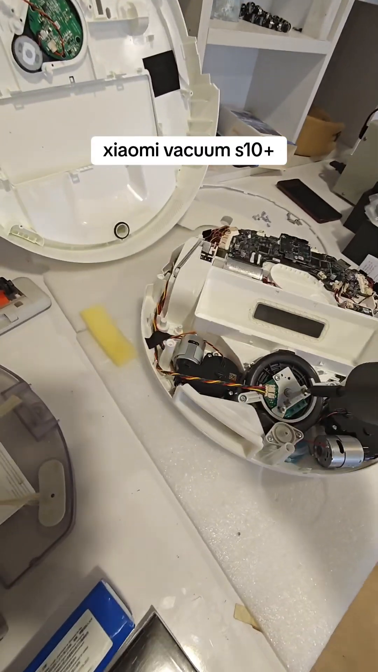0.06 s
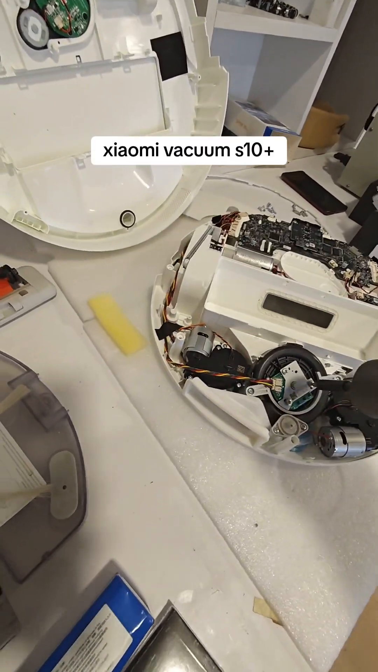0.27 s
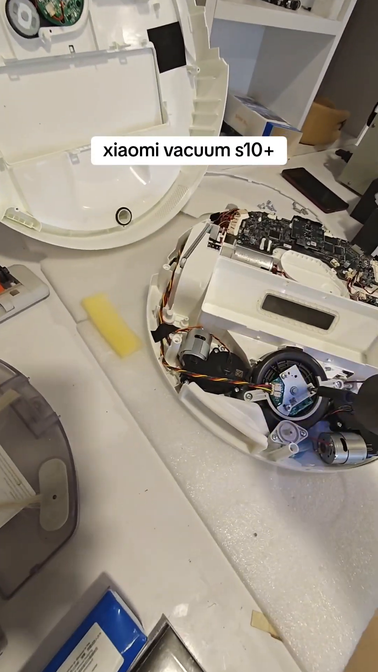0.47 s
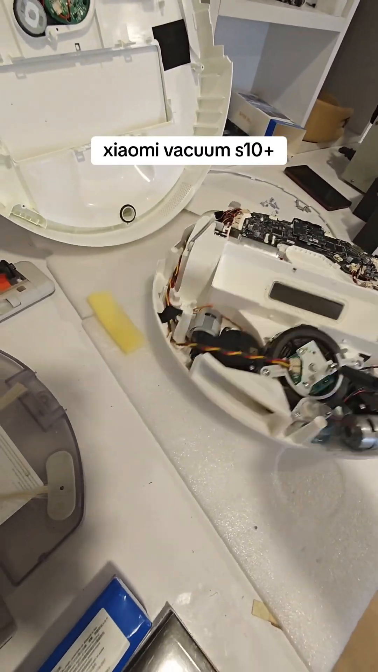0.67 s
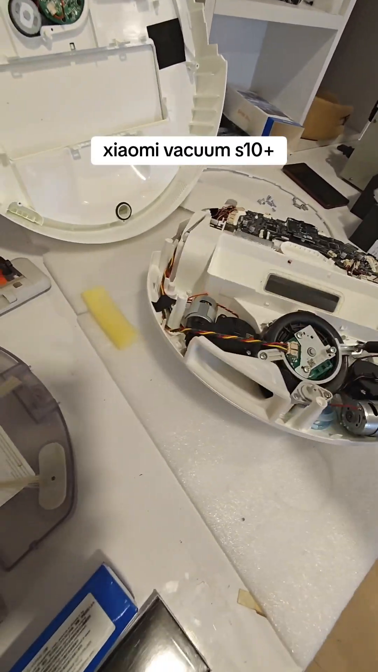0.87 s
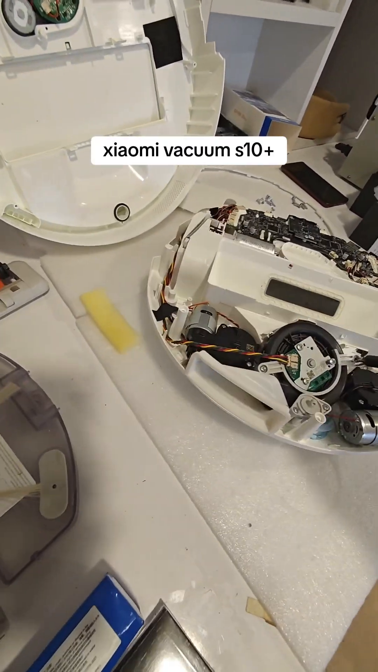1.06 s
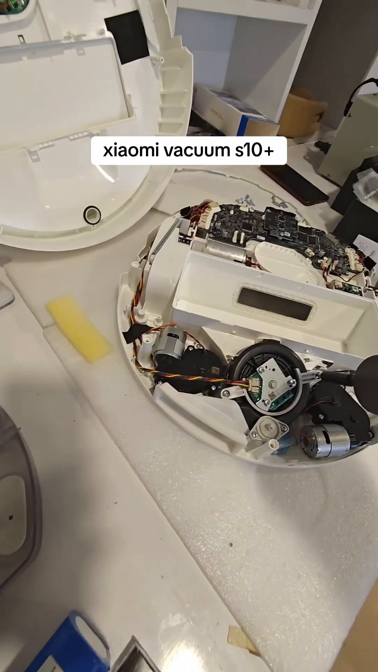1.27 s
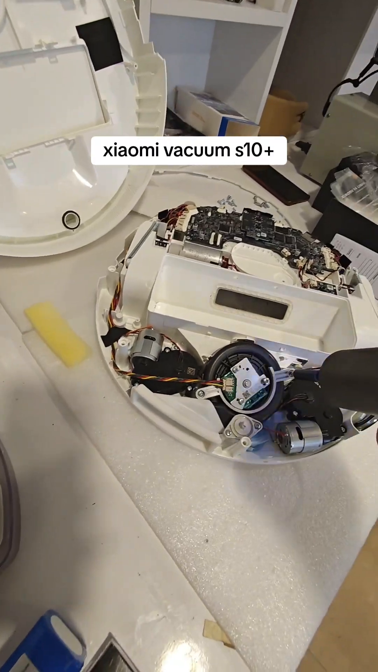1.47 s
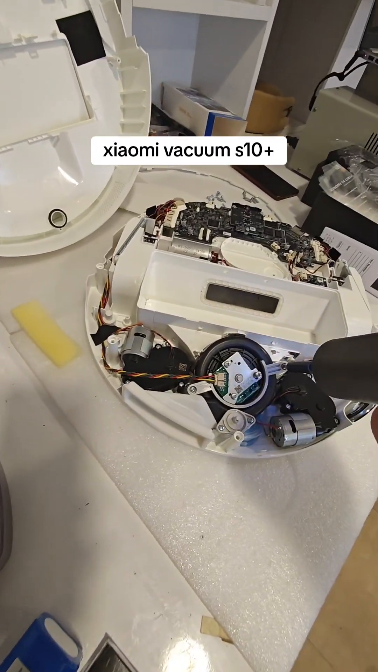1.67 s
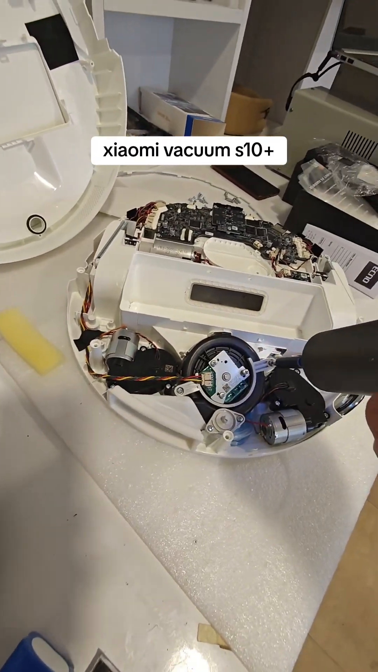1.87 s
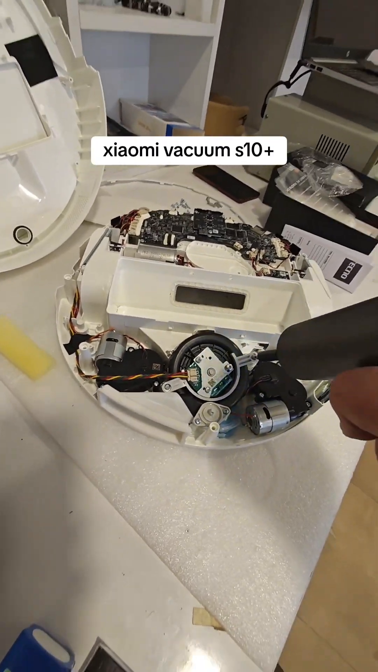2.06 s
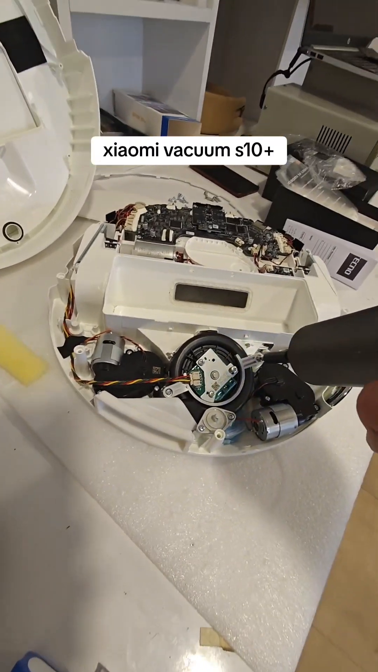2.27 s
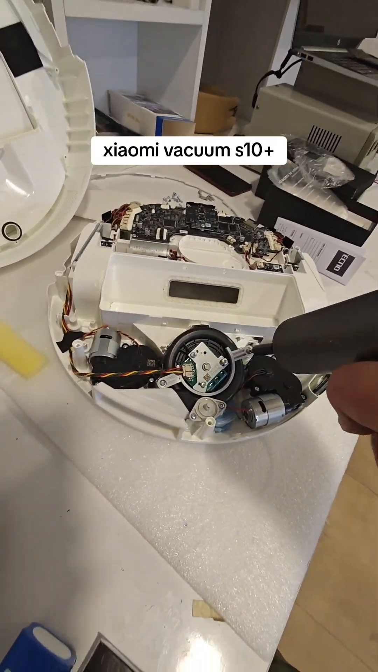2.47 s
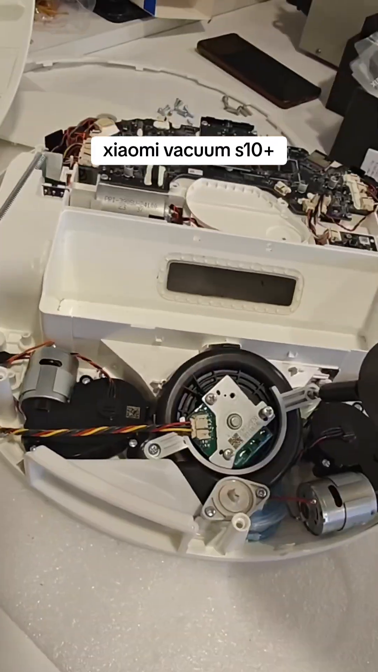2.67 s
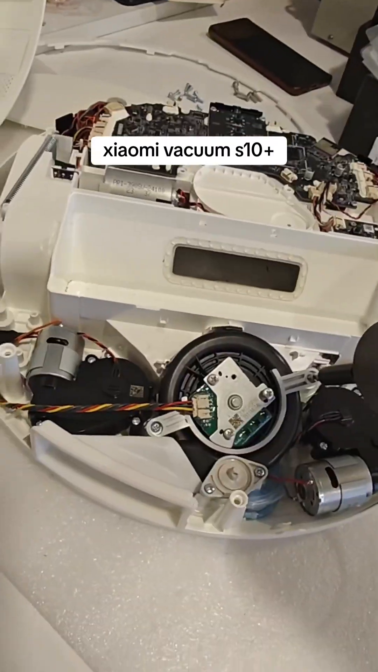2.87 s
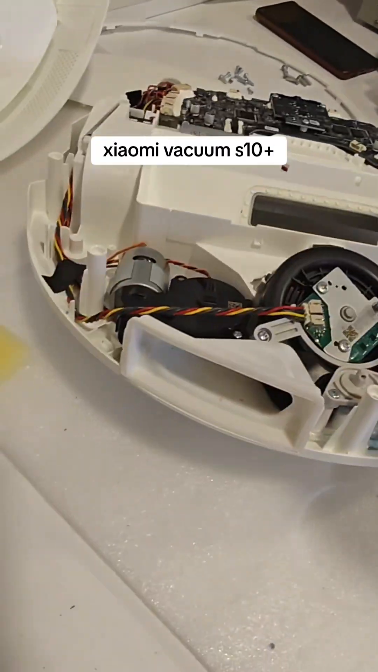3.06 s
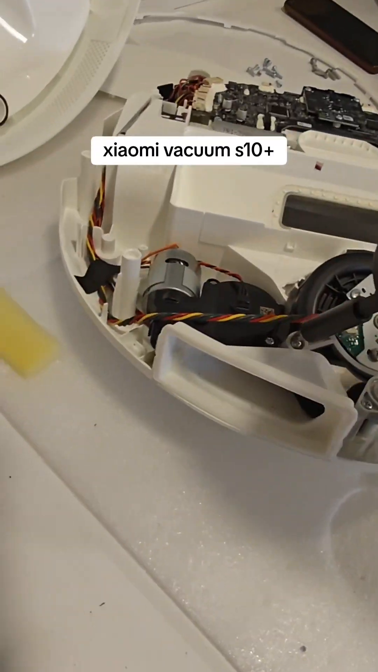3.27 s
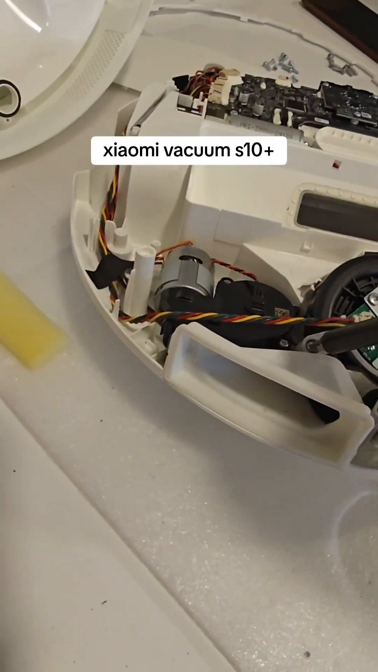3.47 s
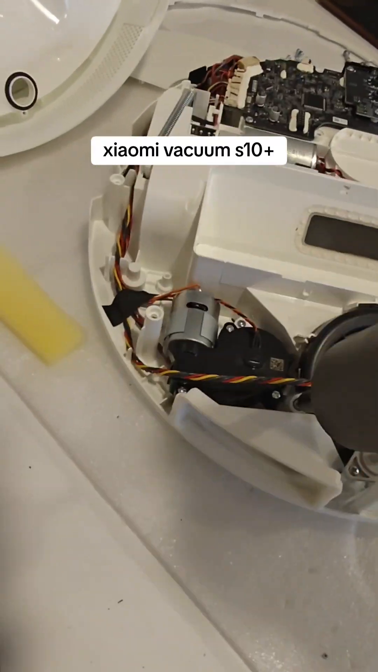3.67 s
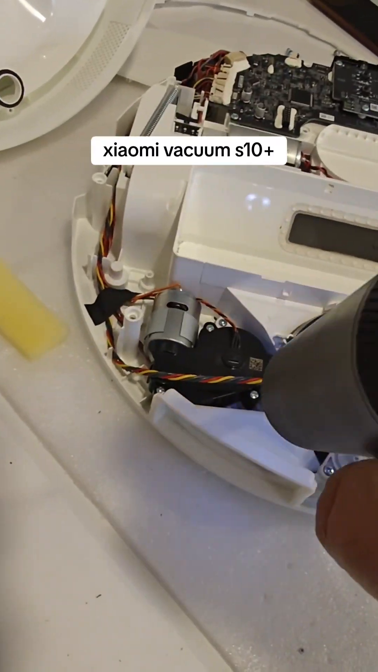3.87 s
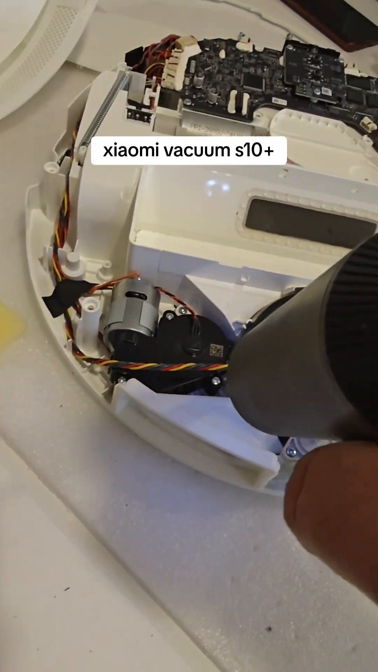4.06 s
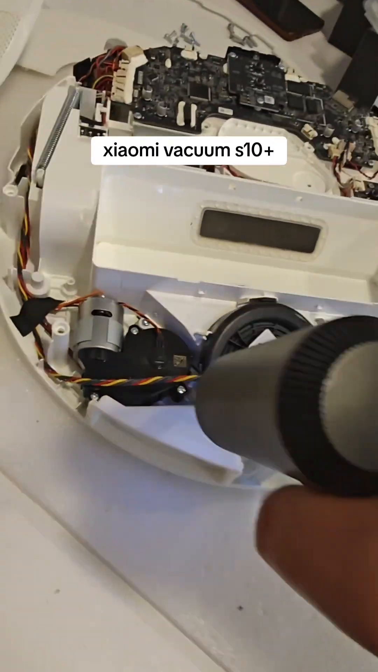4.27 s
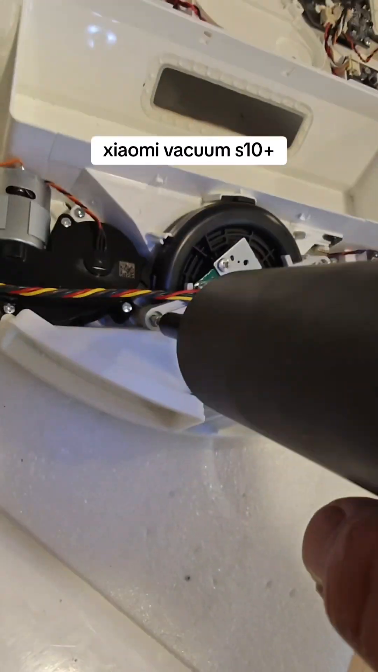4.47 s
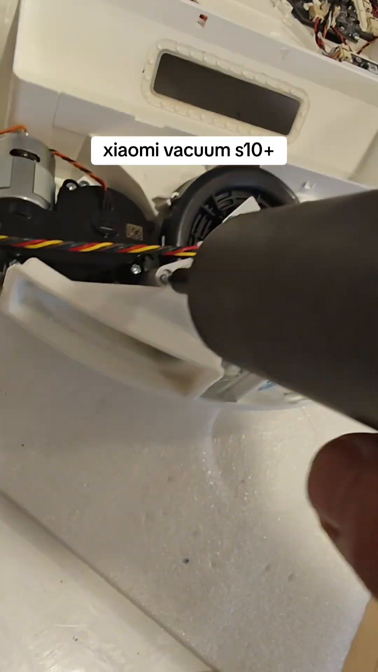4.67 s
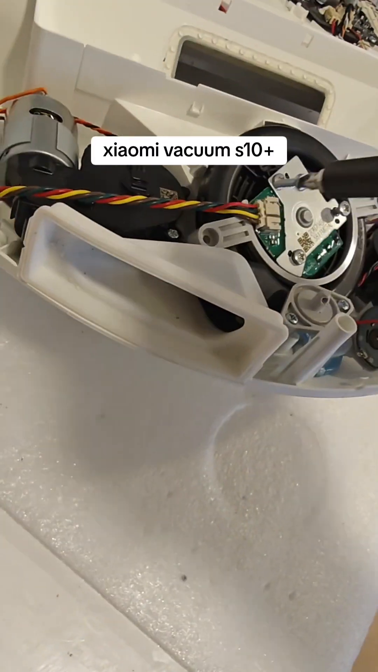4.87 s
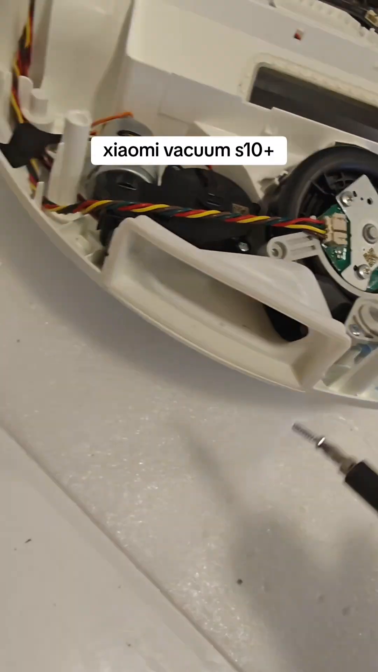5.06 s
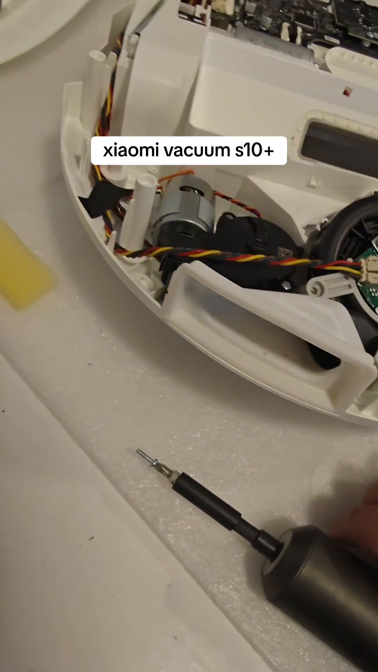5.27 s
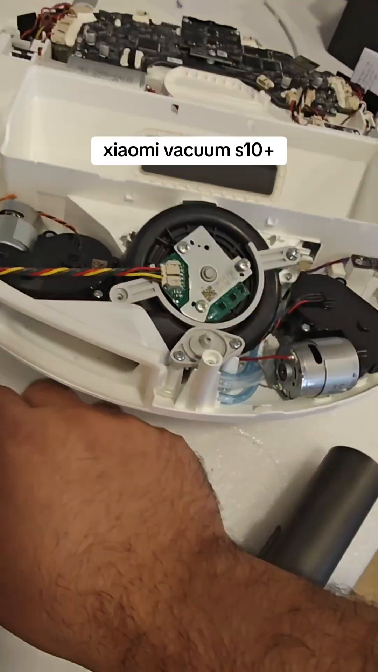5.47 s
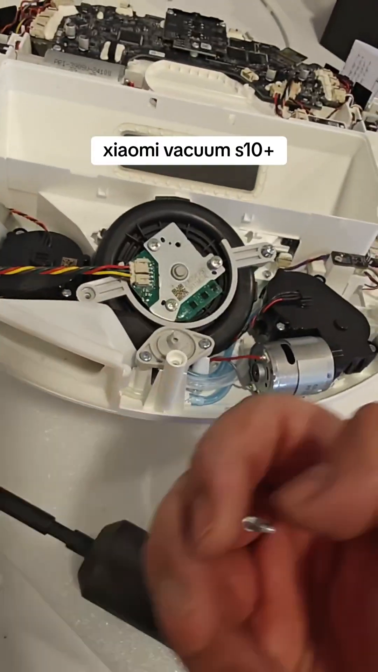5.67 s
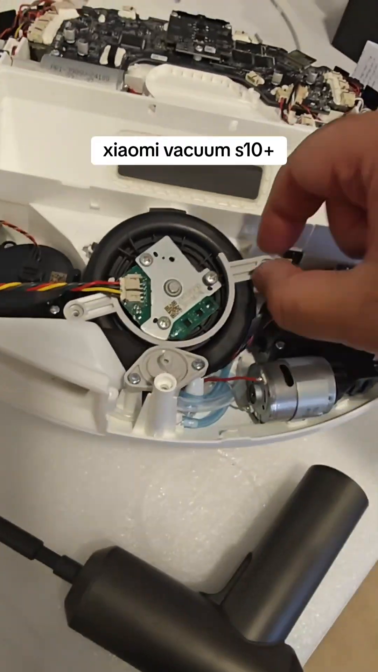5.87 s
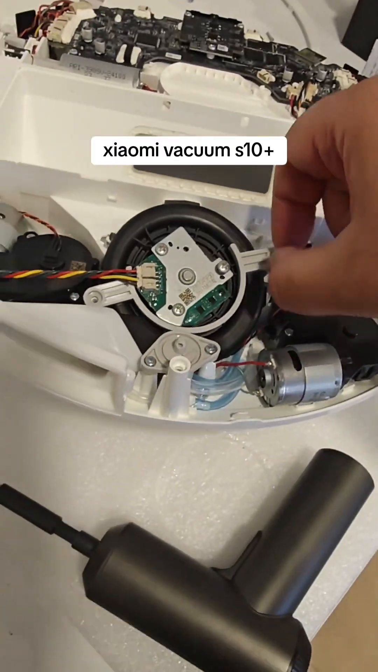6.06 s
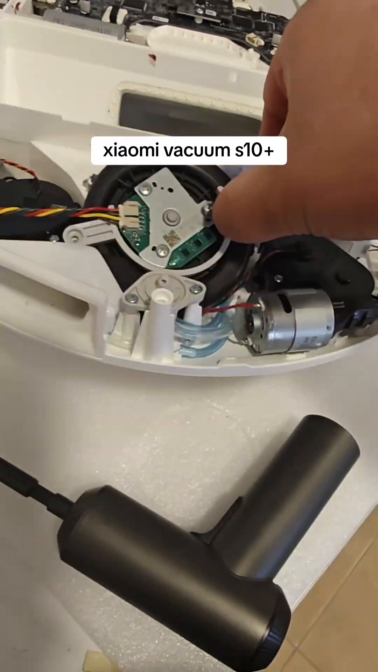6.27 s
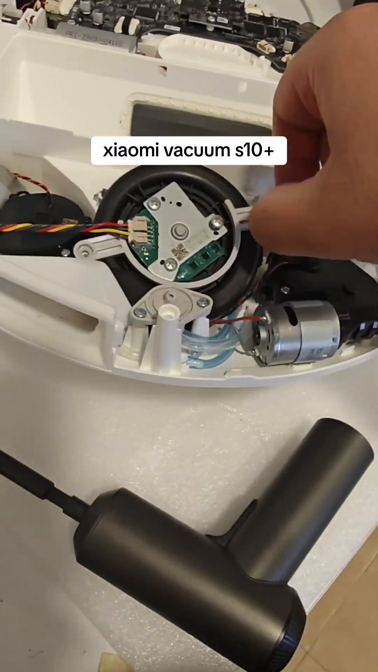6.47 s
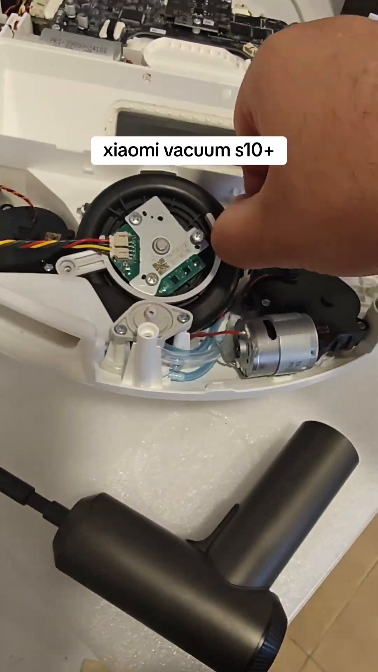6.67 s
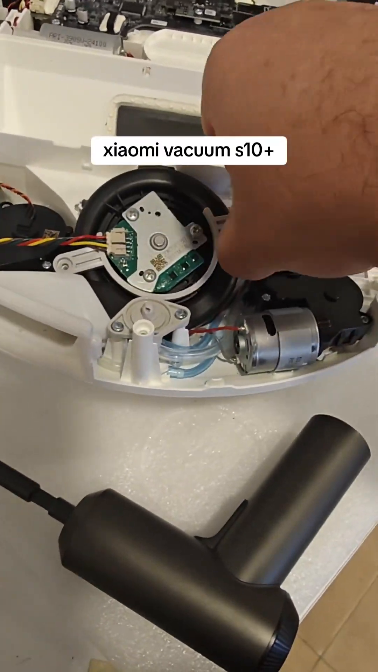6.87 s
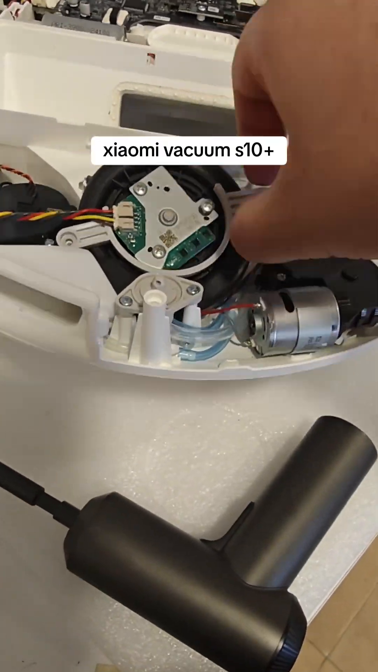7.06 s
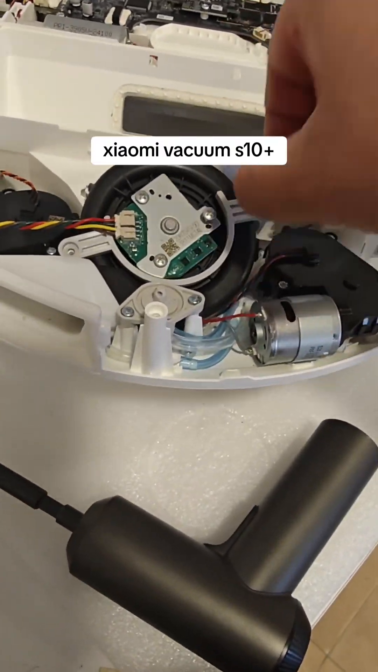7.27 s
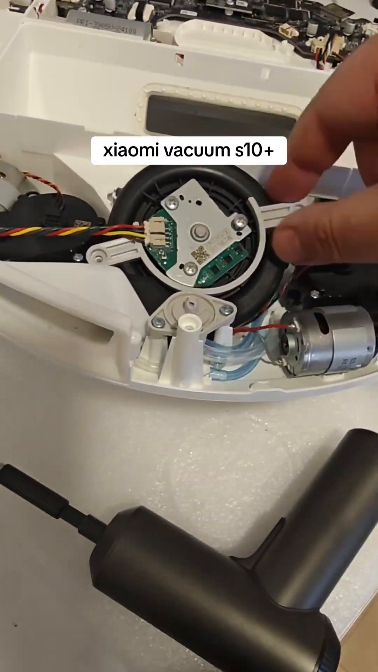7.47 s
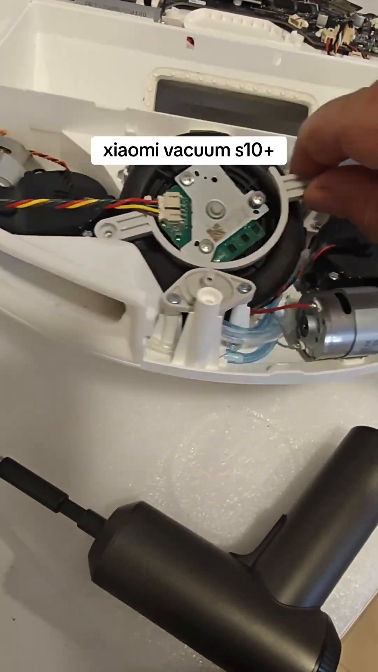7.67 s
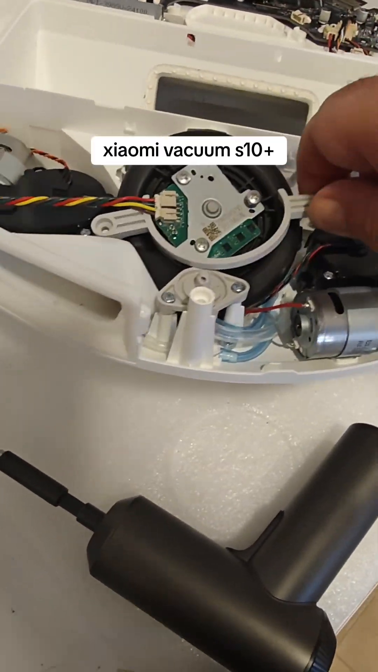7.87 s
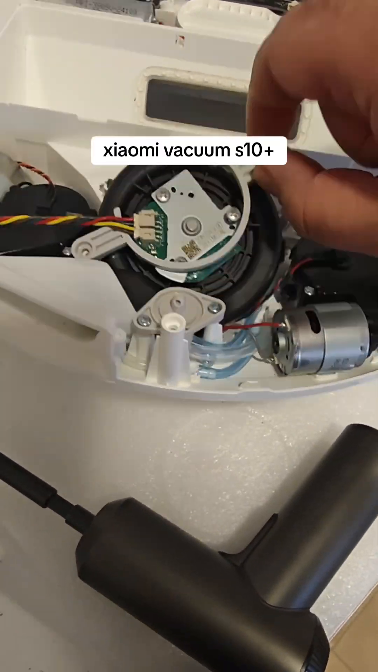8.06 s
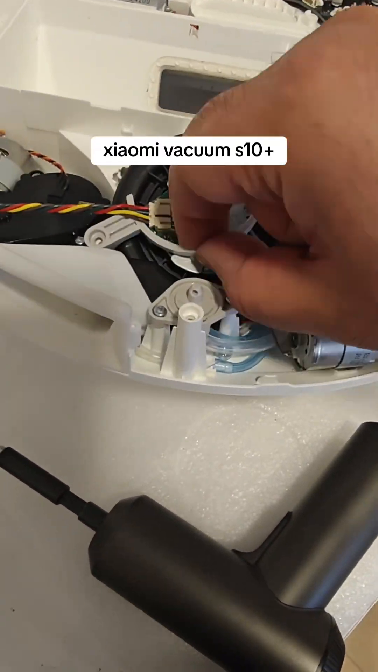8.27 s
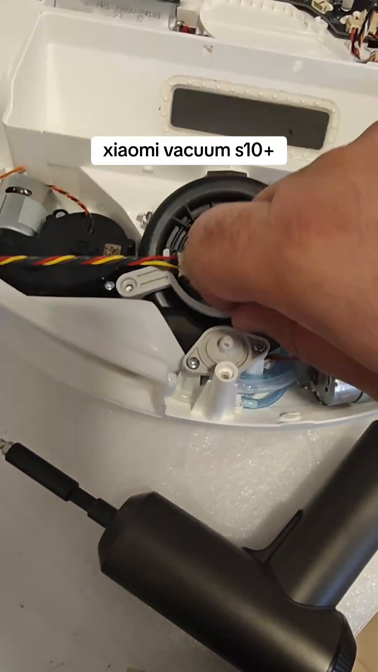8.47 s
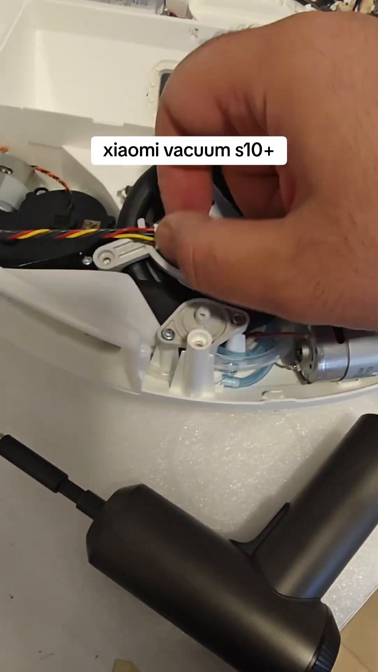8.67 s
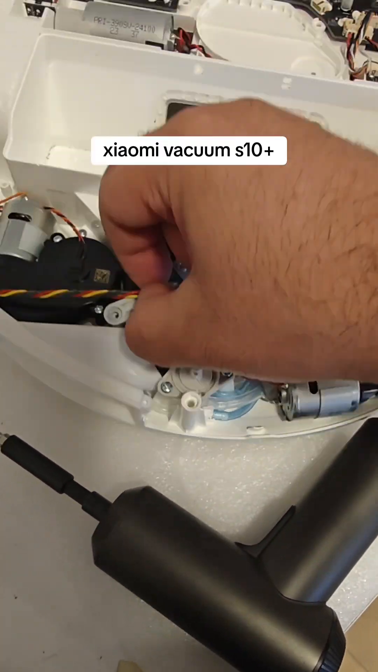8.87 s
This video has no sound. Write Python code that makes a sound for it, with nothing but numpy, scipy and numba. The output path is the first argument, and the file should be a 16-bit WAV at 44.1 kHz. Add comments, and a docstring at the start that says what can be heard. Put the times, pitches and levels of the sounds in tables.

```python
"""First, fingers rub and knock on an opened plastic appliance while a quiet room hums below.
Then a cordless screwdriver runs in four short bursts: gears hiss, brushes fizz and the motor whines.
Between and after the bursts, the bit, the tool and fingers knock and rub the plastic parts, and just
after the last burst the tool scrapes softly on foam. Each knock or scrape is a soft-edged puff of
ringing noise. Left and right sound alike only in the bass."""
import sys
import numpy as np
from scipy import signal
from scipy.fft import rfft, irfft, next_fast_len
from scipy.io import wavfile
from scipy.ndimage import uniform_filter1d, map_coordinates
from numba import njit

SR = 44100
rng = np.random.default_rng(int(sys.argv[2]) if len(sys.argv) > 2 else 0)


def inscribe(sig):
    """Save sig as 16-bit PCM at rate SR to the path in sys.argv[1].

    A 1-D sig is mono; a 2-D sig holds one channel per row.
    Samples are clipped to [-1, 1] before scaling.
    """
    pcm = np.round(np.clip(np.atleast_2d(sig).T, -1, 1) * 32767)
    wavfile.write(sys.argv[1], SR, pcm.astype(np.int16))


N = 393372


def undb(db):
    """Turn decibels into a gain to multiply by."""
    return 10 ** (np.asarray(db) / 20)


def on_log(table, hz):
    """Read between (frequency, value) rows, giving every octave equal room."""
    freqs, values = np.transpose(table)
    return np.interp(np.log(hz), np.log(freqs), values)


# How alike left and right sound: (frequency [Hz], likeness [0-1])
STEREO_LIKENESS = [(40, .99), (85, .965), (150, .87), (330, .82), (550, .35), (1200, .22), (2000, .03),
                   (9000, .05)]

def hiss(colour):
    """Stereo noise of strength 1, shaped by (frequency [Hz], level [dB]) rows and silent outside them."""
    size = next_fast_len(N)
    hz = np.maximum(np.arange(size // 2 + 1) * SR / size, 1)
    gain = undb(on_log(colour, hz)) * (hz > colour[0][0]) * (hz < colour[-1][0])
    alike = np.clip(on_log(STEREO_LIKENESS, hz), 0, 1)
    mid, side = rfft(rng.standard_normal((2, size))) * gain * np.sqrt([1 + alike, 1 - alike])
    out = irfft([mid + side, mid - side], size)[:, :N]
    return out / np.sqrt(np.mean(out ** 2))


@njit
def band_pass(x, hz, sharp):
    """Let through the sound near a moving pitch; sharper means a narrower band."""
    out = np.empty(len(x))
    band, low, damping = 0., 0., 1 / sharp
    for i in range(len(x)):
        g = np.tan(np.pi * hz[i] / SR)
        v = (band + g * (x[i] - low)) / (1 + g * (g + damping))
        band, low = 2 * v - band, low + 2 * g * v
        out[i] = damping * v
    return out


def ring(hz, sharp, steady=16000):
    """Noise ringing at a fixed or moving pitch, its level evened out over `steady` samples."""
    hz = np.full(N, hz, dtype=float)
    noise = hiss([(100, 0.01), (15000, 0)])
    out = np.array([band_pass(band_pass(channel, hz, sharp), hz, sharp) for channel in noise])
    return out / np.sqrt(uniform_filter1d(np.mean(out ** 2, axis=0), size=steady))


def wander(rate):
    """A smooth random curve, roughly -1 to 1, with a new goal `rate` times a second."""
    hold = int(SR / rate)
    steps = np.repeat(rng.standard_normal(N // hold + 1), hold)
    return 0.88 * uniform_filter1d(uniform_filter1d(steps, hold), hold)[:N]


def patchy(x, depth_db, hz, rate):
    """Make patches of the sound, each `hz` wide, rise and fall at random `rate` times a second."""
    spectrum = signal.stft(x, nperseg=1024)[2]
    bins, frames = spectrum.shape[1:]
    grid = rng.standard_normal((300, 500))
    rows = np.arange(bins) * SR / 1024 / hz
    columns = np.arange(frames) * 512 / SR * rate
    places = np.meshgrid(rows, columns, indexing="ij")
    gain = undb(depth_db * map_coordinates(grid, places, order=1, mode="mirror"))
    out = signal.istft(spectrum * gain, nperseg=1024)[1][:, :N]
    return out / np.sqrt(np.mean(gain ** 2))


def curves(tables):
    """Join timed tables: give a switch (1 during a table, else 0), then a curve for each value column."""
    t = np.arange(N) / SR
    on = sum((t >= rows[0][0]) & (t < rows[-1][0]) for rows in tables)
    times, *columns = np.vstack(tables).T
    return uniform_filter1d(on * 1., size=60), *(np.interp(t, times, c) for c in columns)


# The room's slow changes: (time [s], bass [dB], murmur [dB], air [dB])
ROOM_LEVELS = [(0.0, -63.5, -61.5, -64), (0.4, -68.5, -60, -66), (1.3, -62, -61, -64.5),
               (1.7, -75, -67.5, -63), (2.1, -73.5, -67.5, -70), (2.9, -70, -67.5, -70.5),
               (3.7, -71.5, -66, -72), (4.9, -70, -64.5, -73.5), (5.4, -71.5, -67.5, -70),
               (6.5, -70, -67, -66.5), (7.85, -71, -68.5, -64.5), (8.92, -74, -64, -65)]
# Tone of the room's airy noise: (frequency [Hz], level [dB])
AIR_COLOUR = [(190, -36.5), (330, -9), (355, -2), (390, -13.5), (437, -7), (491, -12.5), (707, -5),
              (1100, -6.5), (1420, -28.5), (2400, -37), (4000, -46), (5200, -78), (8800, -120)]
# Notes the room rings at: (pitch [Hz], width [Hz], level against the murmur [dB])
ROOM_NOTES = [(127, 33, -4), (270.4, 80, -1.5), (446, 130, -8.5), (1017, 380, -10)]
MIC_HISS_DB = -95.5

def room():
    """Machines murmur through the room's resonances, wavering over a faint microphone hiss."""
    _, bass_db, murmur_db, air_db = curves([ROOM_LEVELS])
    bass_db += 3.3 * wander(4.3)
    murmur_db += 0.97 * wander(4)
    bass_db += 4.5 * wander(25)  # quick flicker
    out = undb(air_db + 2 * wander(8)) * patchy(hiss(AIR_COLOUR), 2.3, hz=148, rate=10)
    out += undb(MIC_HISS_DB) * hiss([(2500, 0), (16000, -1)])
    out += undb(bass_db) * hiss([(18, -8), (35, -0.5), (60, 1), (100, -3.5), (200, -14), (400, -20)])
    for hz, width, db in ROOM_NOTES:
        out += undb(murmur_db + db + 2.5 * wander(14)) * ring(hz, hz / width)
    return out


# Fingers sliding on plastic: (time [s], rub [dB], sizzle [dB])
RUB_LEVELS = [(0.0, -77, -92), (0.2, -72, -82), (0.38, -80, -84), (0.77, -72, -89), (1.03, -76, -92),
              (1.25, -76, -87.5), (2.04, -82, -94.5), (3.5, -81, -99), (5.101, -82, -93.5),
              (5.3, -81.5, -86), (6.29, -76.5, -96), (6.68, -71, -88), (6.84, -74.5, -98), (7.55, -74, -91),
              (7.79, -66, -79.5), (7.95, -61, -86), (8.22, -73, -84), (8.38, -69, -83), (8.7, -70.5, -100),
              (8.79, -56.5, -93), (8.92, -90, -92)]

def rubbing():
    """Skin drags over plastic in uneven slips."""
    _, rub_db, sizzle_db = curves([RUB_LEVELS])
    slips = undb(2 * wander(37))
    drag = hiss([(900, -2.5), (1400, 6.5), (2200, 5), (2900, -7), (4800, -11.5), (9000, -29)])
    sizzle = hiss([(7500, -14), (11000, -1.5), (13500, -3.5), (16000, -7)])
    return slips * patchy(undb(rub_db) * drag + undb(sizzle_db) * sizzle, 3.7, hz=397, rate=27)


def stray_touches(count=40, fade_s=0.018):
    """Extra knock rows for faint random touches, louder where the rubbing is louder."""
    when, size, shell_pick, clack_pick = rng.random((count, 4)).T
    times, rub_db, _ = np.transpose(RUB_LEVELS)
    when = when * times[-1]
    levels = np.interp(when, times, rub_db) - 9 - 2.5 * np.log(size)  # a few stand out
    return [(s, db + 8, db, db - 8, 600 + 500 * low, 1600 + 3000 * high, fade_s)
            for s, db, low, high in zip(when, levels, shell_pick, clack_pick)]


# Knocks on the plastic and, from about 5.0 to 5.75 s, soft scrapes of the tool sliding on foam:
# (peak time [s], shell [dB], clack [dB], sizzle [dB], shell pitch [Hz], clack pitch [Hz], fade [s])
KNOCKS_AND_SCRAPES = [(0.0316, -62, -75.5, -77, 725, 4300, 0.01), (0.095, -78, -85, -77, 535, 1710, 0.008),
                      (0.1352, -45, -50.5, -56, 708, 4660, 0.028), (0.2588, -62, -75, -84, 710, 2200, 0.01),
                      (0.3005, -63, -83, -67, 593, 1701, 0.0047), (0.371, -68, -80, -77, 890, 3560, 0.006),
                      (0.41, -56, -54, -40, 597, 3700, 0.008), (0.69, -70, -69, -72, 696, 1690, 0.017),
                      (0.7153, -53.5, -54.5, -46.5, 634, 4800, 0.0065),
                      (0.7234, -56.5, -51, -55, 886, 2040, 0.029),
                      (0.7534, -67, -57.5, -62, 860, 4620, 0.006),
                      (0.7662, -58.5, -60, -55, 557, 4340, 0.018),
                      (0.848, -36.5, -41.5, -47.5, 990, 2450, 0.038),
                      (0.9186, -70, -62.5, -72, 1001, 4480, 0.011),
                      (0.9501, -61, -63, -83, 837, 2120, 0.024), (1.0408, -41, -39, -34, 1014, 5280, 0.01),
                      (1.0542, -44, -39.5, -33.5, 990, 5000, 0.013),
                      (1.074, -56, -59, -64, 980, 2170, 0.04),
                      (1.138, -46.5, -45.5, -50.5, 590, 2040, 0.011),
                      (1.152, -41.5, -43.5, -47.5, 600, 2080, 0.023),
                      (1.1744, -49.5, -53.5, -52, 800, 2164, 0.011),
                      (1.1895, -57, -57.5, -64, 916, 5450, 0.031),
                      (2.975, -60, -68, -83.5, 1010, 2200, 0.024),
                      (3.0583, -59.5, -73.5, -83, 738, 4060, 0.01),
                      (3.2542, -54, -65.5, -85, 1085, 2170, 0.0085),
                      (3.2833, -51, -54, -69, 873, 2120, 0.019),
                      (3.4883, -54, -55.5, -56, 1040, 2140, 0.021),
                      (3.6141, -42, -42.8, -48.5, 682, 1530, 0.034),
                      (4.8037, -64.5, -65.5, -84, 830, 5200, 0.01),
                      (5.067, -80, -79, -68, 511, 1539, 0.069), (5.2007, -69.5, -57, -53, 530, 4190, 0.041),
                      (5.2348, -74.5, -61.5, -59, 527, 5340, 0.056),
                      (5.2817, -73, -71, -61, 533, 4715, 0.048), (5.3225, -83, -77, -66, 506, 1604, 0.025),
                      (5.367, -83, -63, -57.5, 734, 5230, 0.049), (5.4805, -72, -73, -77, 710, 4770, 0.04),
                      (5.5123, -74, -71.5, -70.5, 497, 4620, 0.064),
                      (5.582, -71, -66, -61, 500, 2210, 0.032), (5.7288, -70, -84, -82.5, 704, 1523, 0.04),
                      (5.9965, -56.5, -48, -67.5, 980, 1740, 0.025),
                      (6.2528, -66, -67.5, -75, 882, 2260, 0.024),
                      (6.2713, -67, -64.5, -87, 1033, 2130, 0.017),
                      (6.298, -63.5, -60.5, -66, 636, 4460, 0.02),
                      (6.327, -70, -64, -78, 1000, 2030, 0.062),
                      (6.359, -63.5, -60.5, -65, 960, 4500, 0.017),
                      (6.4234, -56.5, -50, -83, 1250, 3730, 0.037),
                      (6.4497, -53, -58, -88, 980, 1850, 0.016), (6.552, -55.5, -63, -97, 1030, 1510, 0.01),
                      (6.6093, -66, -84.5, -79, 700, 2070, 0.04), (6.721, -80, -87, -74, 1010, 1780, 0.077),
                      (7.0342, -63.5, -69.5, -91, 697, 2750, 0.023),
                      (7.095, -64.5, -64.5, -71, 590, 4550, 0.039),
                      (7.1251, -63.5, -64, -70, 1070, 3300, 0.0063),
                      (7.262, -61, -57, -74, 1100, 2180, 0.008),
                      (7.277, -56.5, -48, -69, 1195, 3620, 0.022),
                      (7.3888, -70, -92.5, -76.5, 1030, 1700, 0.02),
                      (7.5513, -62.5, -65, -91, 1065, 1670, 0.015), (7.61, -69, -72, -79, 1060, 1900, 0.01),
                      (7.6416, -65, -58.5, -65, 830, 4608, 0.025),
                      (7.6893, -67.5, -61, -87, 514, 3250, 0.02),
                      (7.716, -73, -60.5, -63, 872, 4500, 0.013), (7.74, -72, -60, -68, 1044, 4600, 0.01),
                      (7.765, -66, -63, -64, 980, 4670, 0.015),
                      (7.7847, -64.5, -56.5, -63, 880, 4730, 0.027),
                      (7.8392, -63.5, -62.5, -89, 620, 2170, 0.02),
                      (7.8616, -69, -72.5, -91, 700, 2220, 0.019), (7.914, -58, -52, -63, 900, 2070, 0.025),
                      (7.949, -60, -52.5, -62, 577, 4500, 0.022),
                      (7.9745, -66, -58.5, -63.4, 980, 2250, 0.0086),
                      (7.983, -60, -64, -68, 915, 4700, 0.017),
                      (8.0038, -63.5, -55.5, -66, 530, 3400, 0.021),
                      (8.047, -66, -57.5, -64, 699, 4672, 0.0051),
                      (8.059, -65, -57.5, -77, 915, 2050, 0.017),
                      (8.0906, -63, -57.5, -61, 968, 3122, 0.013),
                      (8.1225, -67, -71.5, -84, 710, 2290, 0.02),
                      (8.18, -57.5, -66.5, -67.5, 872, 1530, 0.006),
                      (8.25, -79, -88, -78, 870, 1981, 0.051), (8.311, -71, -72, -72, 807, 3120, 0.014),
                      (8.329, -66, -63.5, -66, 950, 4700, 0.006), (8.3638, -71, -65, -69, 506, 3929, 0.016),
                      (8.4124, -70, -59.5, -62, 544, 4540, 0.011),
                      (8.4963, -65.5, -88, -94, 1265, 1620, 0.028),
                      (8.5671, -64.5, -76, -80, 1120, 1650, 0.019),
                      (8.6511, -49, -34, -48, 1186, 1476, 0.029),
                      (8.6936, -65.5, -59, -87, 580, 2360, 0.024),
                      (8.7602, -45.5, -36.5, -55, 1020, 4620, 0.025),
                      (8.887, -63, -55.5, -74, 656, 1959, 0.014),
                      (8.901, -52.5, -55, -70, 570, 1670, 0.029)]
THUMP_DB, THUMP_DB_PER_OCTAVE = -3.5, -16.5  # against the shell at 700 Hz; lower notes thump more
TICK_DB, HARD_KNOCK_DB = 13.5, -53  # tick against the clack; clack level that counts as hard

def knocks_and_scrapes():
    """A soft swell leads into each contact's peak, then it ticks and fades, in four bands, low to high: thump,
    shell, clack, sizzle."""
    power, pitch = np.zeros((4, N + SR)), np.full((2, N), 1000.)
    t = np.arange(-SR // 8, SR // 8) / SR  # seconds from the peak
    contacts = sorted(KNOCKS_AND_SCRAPES + stray_touches())
    for peak_s, shell_db, clack_db, sizzle_db, shell_hz, clack_hz, fade_s in contacts:
        swell_s = 0.011 + 0.19 * fade_s
        span = np.where(t < 0, swell_s, max(fade_s, .002))
        span = span * np.array([[1.4], [1.15], [1], [.95]])  # low bands are slower
        puff = undb(-18 * np.abs(t / span) ** np.where(t < 0, 2.2, 1.4))
        # hard or drawn-out contacts bury the tick
        tick_db = TICK_DB - 0.47 * max(clack_db - HARD_KNOCK_DB, 0) - 150 * fade_s
        tick_shape = np.exp(np.where(t < 0, t / 0.00025, -t / 0.0012))
        tick = undb(tick_db + np.array([[-30], [-6], [0], [0]])) * tick_shape
        thump_db = shell_db + THUMP_DB + THUMP_DB_PER_OCTAVE * np.log2(shell_hz / 700)
        gains = undb([[thump_db], [shell_db], [clack_db], [sizzle_db]])
        i = int(peak_s * SR)
        power[:, i:i + len(t)] += gains ** 2 * (puff ** 2 + tick ** 2)
        pitch[:, max(int((peak_s - swell_s) * SR), 0):] = [[shell_hz], [clack_hz]]
    # each band's loudness curve shapes its own noise
    thump, shell, clack, sizzle = np.sqrt(power[:, SR // 8:SR // 8 + N])
    out = undb(1.5) * thump * hiss([(70, -2), (130, 2.3), (350, 0), (550, -0.5)])
    out += shell * (ring(pitch[0], 7.8, steady=300) + hiss([(400, -6.5), (800, 1.5), (1600, -5.5)]))
    body = hiss([(1300, -4), (2000, 0), (3300, -2), (5200, -3), (7000, -11), (10000, -30)])
    body = patchy(body, 3.5, hz=450, rate=30)
    out += undb(-2.5) * clack * (body + undb(-1.5) * ring(pitch[1], 6.9, steady=100))
    treble = hiss([(4500, -26), (6500, -8.5), (8500, -8), (11000, -2), (13300, -3),
                   (14500, -8.5), (16000, -13.5)])
    return out + undb(-2) * sizzle * patchy(treble, 4, hz=350, rate=57)


# One list per burst: (time [s], gears [dB], whine pitch [Hz], whine against the gears [dB])
BURSTS = [
    [(0.375, -96.5, 2300, -10), (0.395, -59, 2250, -11.5), (0.413, -48, 2150, -9),
     (0.42, -37.5, 2080, -11.5), (0.441, -33, 2030, -5), (0.519, -36.5, 2280, -8),
     (0.549, -39.5, 2270, -10), (0.621, -45.5, 2400, -22), (0.68, -84, 2240, -12)],
    [(1.435, -105, 2290, -6.5), (1.455, -50, 2260, -5), (1.477, -36, 2100, -6), (1.537, -36.5, 2370, -2.5),
     (1.606, -38.5, 2390, -4.5), (1.898, -42.5, 2560, -15), (1.962, -46, 2520, -28),
     (2.002, -57.5, 2360, -20), (2.06, -96.5, 2220, -12.5)],
    [(3.8, -105, 2200, -17), (3.816, -59.5, 2210, 0), (3.834, -38, 2060, -4), (3.88, -37, 2300, 0.5),
     (3.966, -37.5, 2380, -2.5), (4.112, -39.5, 2480, -6.5), (4.196, -48, 2240, -10),
     (4.235, -75, 2290, -7)],
    [(4.235, -72, 2440, -5), (4.263, -40.5, 2550, -7), (4.297, -40.5, 2620, -12.5), (4.55, -40, 2640, -5),
     (4.594, -41.5, 2550, -16), (4.65, -45, 2560, -29), (4.738, -52.5, 2420, -23), (4.782, -67, 2310, -17),
     (4.84, -100, 2290, -14)],
]
# Each burst's mix at full power, against the gears: (housing [dB], fizz [dB], top hiss [dB], octave [dB])
BURST_MIX = [(-9.5, 4, 4.5, -9), (-11, 3.5, 6, -14), (-11.5, 0.5, 4, -14), (-14, 0, 3, -5)]
# How those four drop for each dB below full power: (housing, fizz, top hiss, octave) [dB per dB]
MIX_DROP = [-0.2, -0.29, -0.31, -0.23]
# Tone of the gear hiss: (frequency [Hz], level [dB])
GEAR_COLOUR = [(820, -30), (1400, -18), (2100, -8.5), (2390, -8), (2860, -8.5), (3650, -3.5), (4460, -7),
               (4910, -5), (5800, -6), (7540, -35), (12800, -120)]
# Tone of the housing's rumble: (frequency [Hz], level [dB])
HOUSING_COLOUR = [(88, -36.5), (150, -6.5), (215, -20.5), (258, -11), (629, -6.5), (723, -2.5), (1300, -5),
                  (1900, -6), (2470, -33.5), (4180, -120)]
# Notes the housing rings at: (pitch [Hz], width [Hz], relative level [dB])
HOUSING_NOTES = [(300, 40, -8), (564, 40, -3), (713, 26, -0.5), (846, 60, -3.5), (1073.5, 40, -0.5),
                 (1706, 46, 0.5)]

def screwdriver():
    """Gears hiss, brushes fizz, the housing rumbles and rings, and the motor whines in two octaves."""
    bursts = []
    for rows, mix_db in zip(BURSTS, BURST_MIX):
        full_db = max(row[1] for row in rows)
        bursts.append([(*row, *(mix_db + np.array(MIX_DROP) * (full_db - row[1]))) for row in rows])
    on, gear_db, whine_hz, whine_db, housing_db, fizz_db, top_db, octave_db = curves(bursts)
    gears = undb(3 + 0.96 * wander(60)) * hiss(GEAR_COLOUR)
    housing = undb(0.5 + 0.88 * wander(30)) * hiss(HOUSING_COLOUR)
    for hz, width, db in HOUSING_NOTES:
        housing += undb(db - 10 + 2.5 * wander(12)) * ring(hz, hz / width)
    fizz_colour = [(5300, -14.5), (6100, 0.5), (7300, 0), (8500, 1), (9400, -4.5), (10000, -5)]
    fizz = undb(fizz_db + 1.5 * wander(55)) * hiss(fizz_colour)
    top_colour = [(9500, -8), (10500, -2), (12500, 0), (14500, -2), (16000, -8)]
    top = undb(top_db + 0.79 * wander(50)) * hiss(top_colour)
    whine_hz *= 1 + 0.016 * wander(30)
    whine = undb(whine_db + 4.9 * wander(40)) * ring(whine_hz, sharp=4.8)
    octave = undb(octave_db + 0.83 * wander(35)) * ring(2 * whine_hz, sharp=14.)
    hissing = patchy(gears + fizz + top, 4.6, hz=90.75, rate=22)
    return on * undb(gear_db) * (hissing + undb(housing_db) * housing + whine + octave)


def scene():
    """The work on the bench and the room around it, added together."""
    return screwdriver() + knocks_and_scrapes() + rubbing() + room()


def record(dry, top_hz=15800):
    """Cut away the very highest treble."""
    return signal.sosfilt(signal.ellip(10, .2, 75, top_hz, fs=SR, output="sos"), dry)


dry = scene()
out = record(dry)
inscribe(out)
```